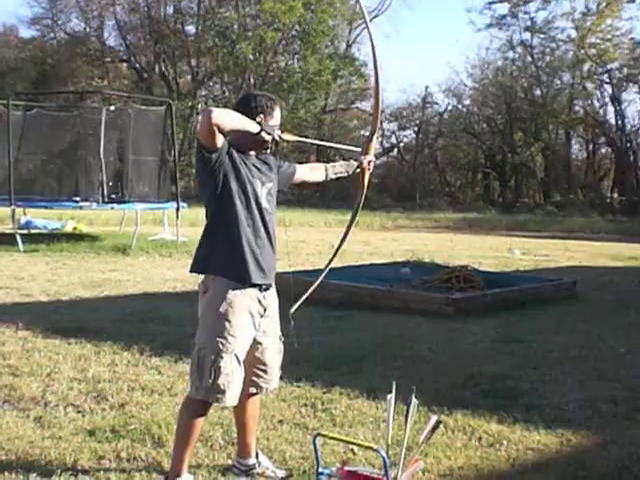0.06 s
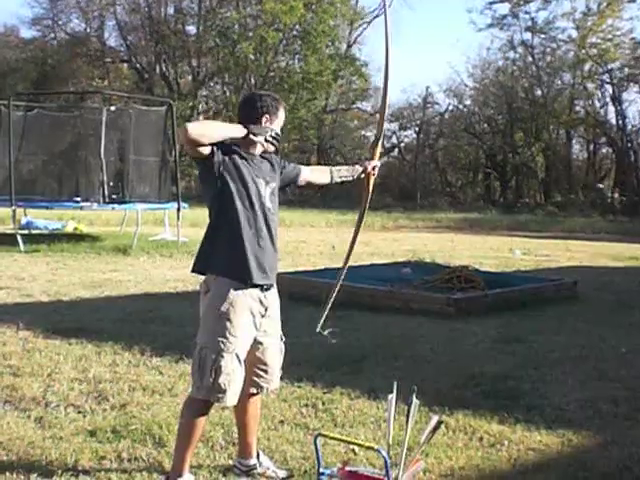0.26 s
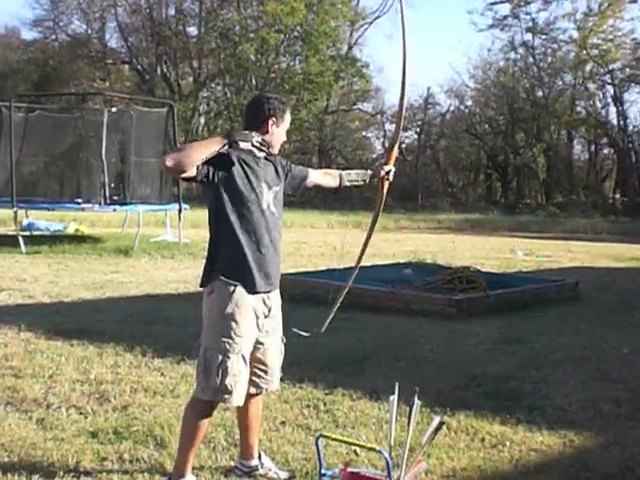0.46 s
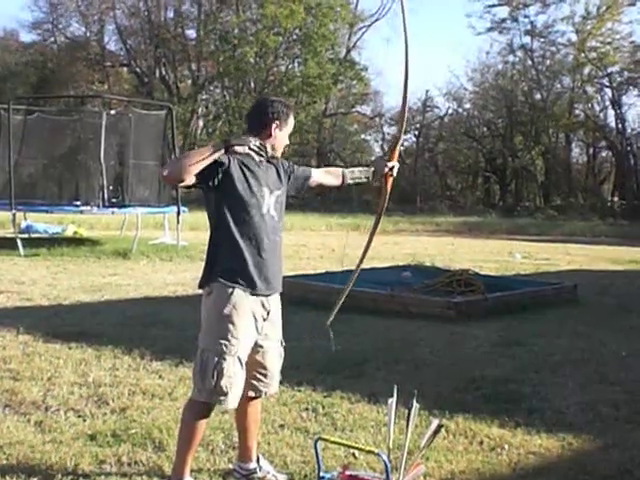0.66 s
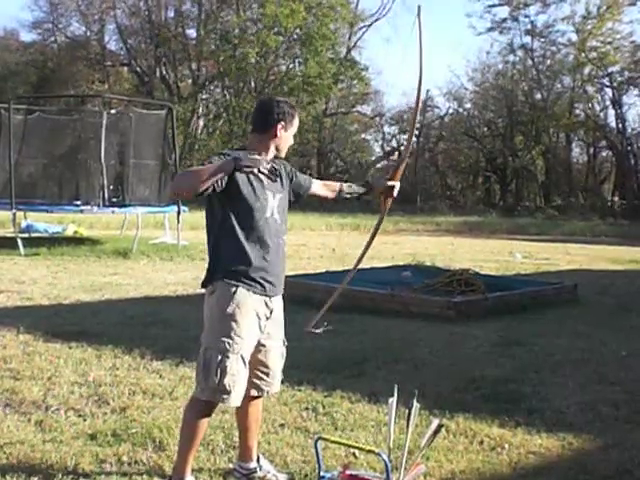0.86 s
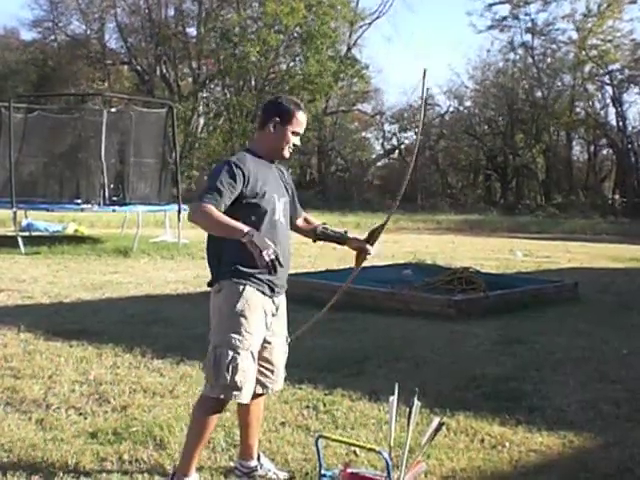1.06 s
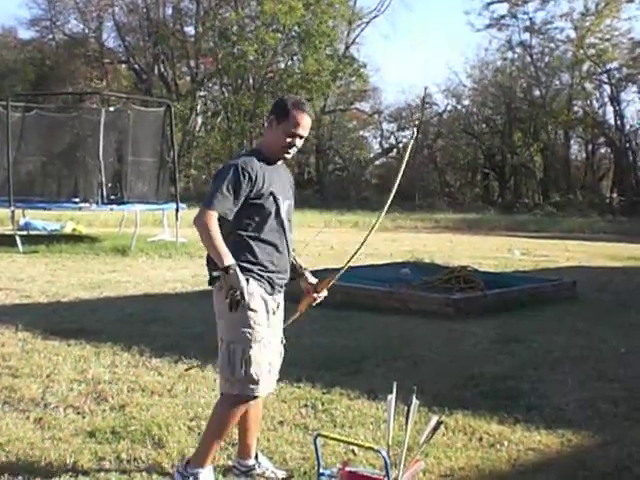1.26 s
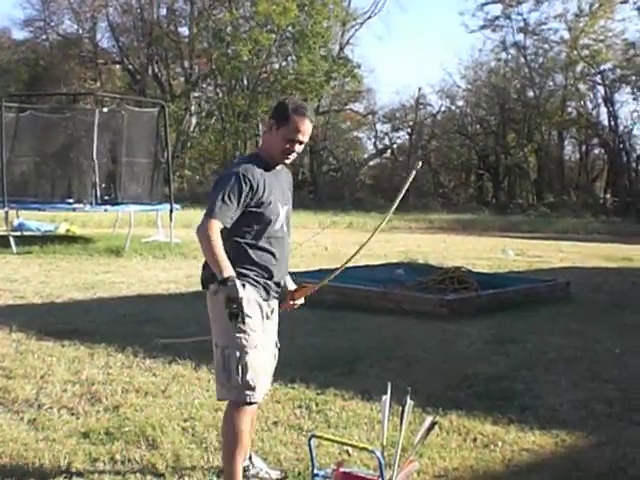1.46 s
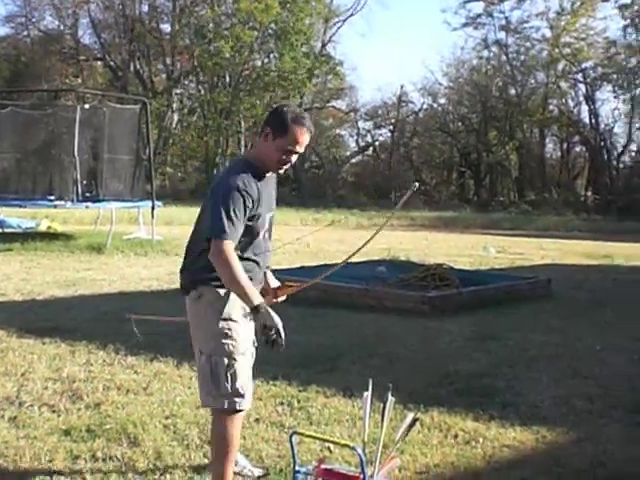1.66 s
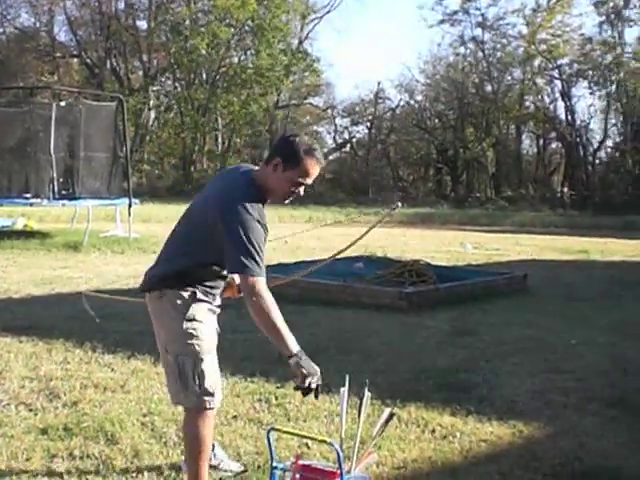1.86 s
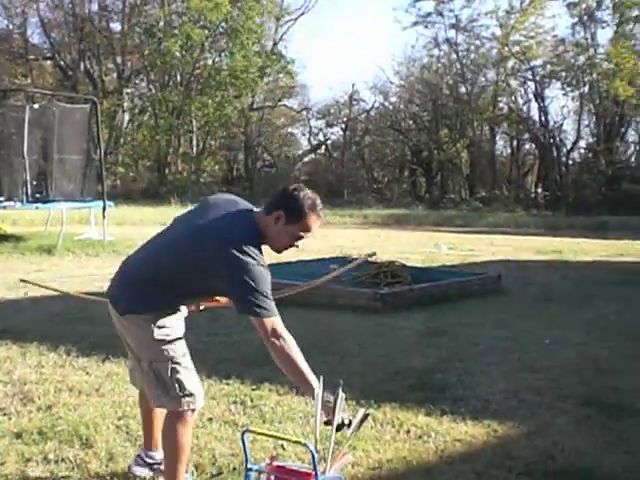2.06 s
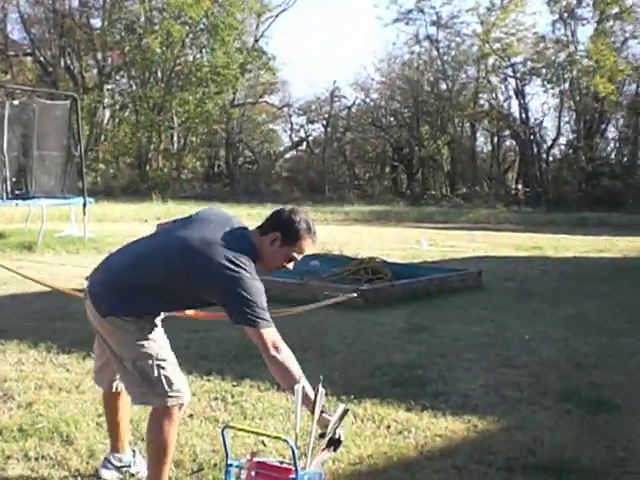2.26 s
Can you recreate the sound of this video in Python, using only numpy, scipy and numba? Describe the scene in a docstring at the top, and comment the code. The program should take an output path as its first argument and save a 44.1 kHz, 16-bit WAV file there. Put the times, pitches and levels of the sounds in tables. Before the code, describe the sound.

Arrow shot from a bow outdoors, in mono: dry string release with wooden rattle, a fading whistling hiss, a cracking thump into the target, light clicks and brushing cloth, over faint distant traffic and a bird.

```python
"""Back yard with fences and trees: a longbow is shot into a target, heard in mono by a small camera with a limiter.
Near the microphone, bands of noise rub as the string slips off the glove; decaying sines ring as the arrow chatters.
Its feathers hiss and whistle away as fluttering noise; the target thuds in decaying modes, noise swells as echoes.
Then cloth brushes and gear clicks. Far off: a bird's falling note, traffic noise and a wavering hum."""
import sys
import numpy as np
from scipy import signal
from scipy.fft import rfft, irfft
from scipy.io import wavfile
from scipy.ndimage import uniform_filter1d
from numba import njit

SR = 44100
rng = np.random.default_rng(int(sys.argv[2]) if len(sys.argv) > 2 else 0)


def to_wav(s):
    """Save 16-bit WAV."""
    ch = np.atleast_2d(s).T  # columns
    pcm = np.round(np.clip(ch, -1, 1) * 32767)  # PCM
    wavfile.write(sys.argv[1], SR, pcm.astype(np.int16))


N = 101429
T = np.arange(N) / SR


def undb(db):
    """Decibels to gain."""
    return 10 ** (np.asarray(db) / 20)


def unit(x):
    """Scale to rms 1."""
    return x / np.sqrt(np.mean(x ** 2))


def curve(rows):
    """Gain over time from (s, dB) points."""
    return undb(np.interp(T, *np.array(rows).T))


def shaped_noise(gain):
    """White noise given a gain at each frequency, at rms 1."""
    return unit(irfft(rfft(rng.standard_normal(N)) * gain, N))


def frequencies():
    """Frequencies of the spectrum in Hz, kept off zero."""
    return np.maximum(np.fft.rfftfreq(N, 1 / SR), 1)


def noise(points):
    """Noise coloured by (Hz, dB) points, joined along log frequency."""
    hz, db = np.array(points).T
    return shaped_noise(undb(np.interp(np.log(frequencies()), np.log(hz), db)))


def band(hz, width):
    """Noise in one resonance, centre and width in Hz."""
    f = frequencies()
    return shaped_noise(1 / (1 + 1j * (f / hz - hz / f) * hz / width))


def walk(rate):
    """Smooth random wander of rms 1; a higher rate in Hz wanders faster."""
    k = max(int(SR / rate), 1)
    once = uniform_filter1d(rng.standard_normal(N), k)
    return unit(uniform_filter1d(once, k))


def fade(t, t60):
    """Exponential decay from time zero, 60 dB down after t60 seconds."""
    return np.exp(-np.log(1000) * np.maximum(t, 0) / t60)


def swell(start, rise, t60):
    """Envelope: a curved rise, then a decay, all in seconds."""
    return np.clip((T - start) / rise, 0, 1) ** 2 * fade(T - start - rise, t60)


def strike(blows, modes):
    """Blows (s, dB) ring a set of decaying sine modes (Hz, dB, t60 s) of alternating sign."""
    t = T[:SR // 4]
    ring = np.zeros(len(t))
    for k, (hz, db, t60) in enumerate(modes):
        ring += (-1) ** k * undb(db) * np.sin(2 * np.pi * hz * t) * fade(t, t60)
    push = np.zeros(N)
    for s, db in blows:
        push[int(s * SR)] += undb(db)
    return signal.fftconvolve(push, ring)[:N]


# Hiss of the microphone itself. Each row: frequency in Hz, relative level in dB per Hz.
MICROPHONE_COLOUR = [(1000, -4.5), (3000, 1.5), (6500, -2.5), (7700, -5), (8900, 0), (10000, -6),
                     (13000, -2), (15500, 1)]
MICROPHONE_DB = -57.5


def microphone_hiss():
    """The microphone's own steady noise, with a fixed colour."""
    return undb(MICROPHONE_DB) * noise(MICROPHONE_COLOUR)


# Distant traffic, its swell. Each row: time in seconds, level in dB.
TRAFFIC_SWELL = [(0, -53.5), (.9, -55), (1.3, -55), (1.9, -53.5), (2.15, -51.5), (2.3, -53.5)]
# Colour of the distant traffic. Each row: frequency in Hz, relative level in dB per Hz.
TRAFFIC_COLOUR = [(25, -6.5), (70, -4), (150, -5.5), (300, -2), (450, -4), (750, -0.5), (1100, -4),
                  (1700, -12), (3000, -19), (6000, -29.5)]


def distant_traffic():
    """Many far engines and tyres blur into coloured noise whose level wanders."""
    unsteady = undb(0.86 * walk(6))  # spread in dB, rate in Hz
    return curve(TRAFFIC_SWELL) * noise(TRAFFIC_COLOUR) * unsteady


HUM_HZ, HUM_DB = 439.6, -62.5


def machine_hum():
    """A faint machine tone wavers slightly in pitch and more slowly in level."""
    hz = HUM_HZ * (1 + 0.0034 * walk(7.3))
    level = undb(HUM_DB + 3.9 * walk(2.8))
    return np.sin(2 * np.pi * np.cumsum(hz) / SR) * level


BIRD_S, BIRD_LENGTH_S, BIRD_HZ, BIRD_END_HZ = 1.715, .08, 2990, 1970
BIRD_DB, BIRD_T60_S = -53.5, 0.22


def far_bird():
    """A single falling whistle, smeared by the trees through a decaying noise response."""
    along = np.clip((T - BIRD_S) / BIRD_LENGTH_S, 0, 1)
    hz = BIRD_HZ * (BIRD_END_HZ / BIRD_HZ) ** along
    note = np.sqrt(4 * along * (1 - along)) * np.sin(2 * np.pi * np.cumsum(hz) / SR)
    trees = rng.standard_normal(N) * fade(T, BIRD_T60_S)
    smeared = signal.fftconvolve(note, trees / np.linalg.norm(trees))[:N]
    return undb(BIRD_DB) * (note + smeared)


# Cloth brushing after the shot. Each row: time in seconds, level in dB.
CLOTH_SWELL = [(1.1, -68), (1.3, -56.5), (1.5, -49), (1.61, -47.5), (1.645, -53.5), (1.72, -58.5),
               (1.9, -55.5), (2.1, -58), (2.3, -63)]
# Colour of the cloth. Each row: frequency in Hz, relative level in dB per Hz.
CLOTH_COLOUR = [(500, -17), (2000, -6), (4200, -0.5), (6000, -5.5), (9000, 0.5), (12000, 2.5), (15000, 1.5)]


def cloth_brush():
    """Cloth brushes as the arm drops: noise with a quick, uneven level."""
    return curve(CLOTH_SWELL) * noise(CLOTH_COLOUR) * undb(1.76 * walk(120))


# Clicks of string, glove and gear. Each row: start in seconds, level in dB, t60 in seconds, centre in Hz.
CLICK_ROWS = [(0.339, -33, .01, 11000), (0.3385, -30, 0.016, 1690), (1.618, -19.5, 0.0031, 11000),
              (1.621, -24, 0.0053, 9000), (1.621, -34.5, 0.013, 1700), (1.6266, -26.5, 0.0075, 10000),
              (1.6535, -22.5, 0.0042, 13000), (1.692, -33, .012, 11900), (1.7219, -31, 0.0047, 6950),
              (1.806, -38, 0.0048, 13000), (1.866, -40, .005, 14000), (1.917, -42, .005, 14000),
              (2.004, -39.5, .008, 13000), (2.256, -42, .004, 9000)]
CLICK_WIDTH = 0.77  # share of the centre


def gear_clicks():
    """Small hard parts click: sharp, short bursts of resonant noise."""
    out = np.zeros(N)
    for s, db, t60, hz in CLICK_ROWS:
        out += undb(db) * swell(s, 0.00019, t60) * band(hz, CLICK_WIDTH * hz)
    return out


# Hiss of the feathers on the way out. Each row: frequency in Hz, relative level in dB per Hz.
FEATHER_COLOUR = [(150, -13), (500, -13), (950, -3), (1500, -9), (3000, -8), (4500, -3.5), (6500, 1.5),
                  (8500, -8.5), (10500, -22), (16000, -30)]
# Whistles of the feathers. Each row: centre in Hz, width in Hz, relative level in dB.
FEATHER_WHISTLES = [(4170, 130, -3.5), (4940, 89, 3), (5530, 76, -2), (6100, 150, -3), (6840, 90, 0),
                    (7560, 110, -14), (8200, 110, -20.5)]
FLIGHT_S, FLIGHT_RISE_S, FLIGHT_T60_S = 0.26, 0.042, 0.27
FLIGHT_DB, FLIGHT_FIRST_DB = -28.5, -9.5  # level of the hiss, and its onset relative to that
WHISTLE_DB, WHISTLE_T60_S, FLUTTER_DB = -36, 0.17, 2.5
FAR_FLIGHT_DB = -64  # steady whistle under the fading one
HIT_S = 0.6146  # ends the flight


def flight():
    """The feathers hiss and whistle, fluttering as the arrow flexes and fading as it leaves."""
    whistle = unit(sum(undb(db) * band(hz, width) for hz, width, db in FEATHER_WHISTLES))
    rise = undb(FLIGHT_FIRST_DB * np.clip(1 - (T - FLIGHT_S) / FLIGHT_RISE_S, 0, 1))
    leaving = fade(T - FLIGHT_S - FLIGHT_RISE_S, FLIGHT_T60_S)
    hiss = undb(FLIGHT_DB) * rise * leaving * noise(FEATHER_COLOUR)
    whistle_level = undb(WHISTLE_DB) * swell(FLIGHT_S, FLIGHT_RISE_S, WHISTLE_T60_S) + undb(FAR_FLIGHT_DB)
    flutter = undb(FLUTTER_DB * walk(300))
    in_air = (T > FLIGHT_S) * (T < HIT_S)
    return (hiss + whistle_level * whistle) * flutter * in_air


# Rubs close by: string off the glove, shaft on the bow, feathers on the bow.
# Each row: start in seconds, rise in seconds, t60 in seconds, level in dB, centre in Hz, width in Hz.
RUB_ROWS = [(0.2309, 0.0064, 0.023, -22.5, 3620, 1300), (0.2466, 0.0016, .05, -25, 3260, 3500),
            (0.2486, 0.0063, 0.042, -17, 3800, 3200), (0.253, 0.00076, .012, -17, 12400, 7000)]


def release_rubs():
    """String, shaft and feathers slide over glove and bow: friction as swelling bands of noise."""
    out = np.zeros(N)
    for s, rise, t60, db, hz, width in RUB_ROWS:
        out += undb(db) * swell(s, rise, t60) * band(hz, width)
    return out


# Ring of shaft and bow. Each row: frequency in Hz, relative level in dB, t60 in seconds.
SHAFT_MODES = [(325, -38, 0.11), (899, -34, 0.12), (1182, -40.5, 0.064), (1845, -31, 0.058),
               (2155, -26.5, 0.053), (2950, -36.5, 0.018), (4110, -9, 0.008), (4860, 1, 0.0029),
               (5340, -1, 0.0037), (6850, -8.5, 0.0024)]
# Lighter knocks of string and bow. Each row: time in seconds, level in dB.
LIGHT_KNOCKS = [(0.2374, -11.5), (.2860, -18), (.3066, -11.5)]
CHATTER_S, CHATTER_HZ, CHATTER_DB, CHATTER_T60_S = .2549, 641, 2.5, .03
CHATTER_JITTER = 0.061  # spread of the timing, share of a period


def arrow_chatter():
    """The arrow bounces along the bow in a dying buzz; bounces and knocks ring shaft and bow."""
    chance = rng.standard_normal((12, 2))  # one row a bounce: timing, level
    after = np.arange(len(chance)) / CHATTER_HZ
    times = CHATTER_S + after + CHATTER_JITTER * chance[:, 0] / CHATTER_HZ
    dying_db = 20 * np.log10(fade(after - 1 / CHATTER_HZ, CHATTER_T60_S))
    levels = CHATTER_DB + dying_db + chance[:, 1]
    return strike(list(zip(times, levels)) + list(LIGHT_KNOCKS), SHAFT_MODES)


# Scattered echoes off the yard and the tree line.
# Each row: delay in seconds, rise in seconds, t60 in seconds, level of the thud in dB, level of the knock in dB.
ECHO_ROWS = [(.004, 0.014, 0.3, -34.5, -37), (.15, 0.03, 1, -61, -54.5)]
# Colour of the echoed thud. Each row: frequency in Hz, relative level in dB per Hz.
THUD_COLOUR = [(100, -27), (230, -3), (350, 1), (650, -8), (1000, -15), (2000, -47)]
# Colour of the echoed knock. Each row: frequency in Hz, relative level in dB per Hz.
KNOCK_COLOUR = [(1200, -35), (1900, -2.5), (2500, 2.5), (3300, -8), (4500, -18.5), (9000, -40)]


def yard_echoes():
    """The yard and the tree line scatter the hit back as swells of low and high noise."""
    thud, knock = noise(THUD_COLOUR), noise(KNOCK_COLOUR)
    out = np.zeros(N)
    for delay, rise, t60, low_db, high_db in ECHO_ROWS:
        scattered = undb(low_db) * thud + undb(high_db) * knock
        out += swell(HIT_S + delay, rise, t60) * scattered
    return out


# Target face and the arrow in it. Each row: frequency in Hz, relative level in dB, t60 in seconds.
TARGET_MODES = [(230.6, -19.5, .026), (338, -12.5, 0.021), (473, -13.5, 0.016), (646, -13, 0.022),
                (730, -20, 0.022), (1490, -26, 0.0036), (1980, -12.5, 0.0054), (2550, 1, 0.0051),
                (3280, -1, 0.0026), (4550, -8.5, 0.0033), (7600, -14.5, 0.0013)]
HIT_DB, CRACK_DB, CRACK_T60_S = 7, -15, 0.0052


def target_hit():
    """The point cracks in as a short noise burst; the target thumps in damped modes."""
    thump = strike([(HIT_S, HIT_DB)], TARGET_MODES)
    crack = undb(CRACK_DB) * swell(HIT_S, 0.00025, CRACK_T60_S) * band(9300, 14000)
    return thump + crack


def scene():
    """The shot and its surroundings, in mono."""
    background = microphone_hiss() + distant_traffic() + machine_hum() + far_bird()
    archer = cloth_brush() + gear_clicks()
    shot = flight() + release_rubs() + arrow_chatter() + yard_echoes() + target_hit()
    return (background + archer + shot)[None]


@njit
def follow(x, attack, recover):
    """Peak follower: moves by one share of the gap when rising, another when falling."""
    out, e = np.empty(len(x)), 0.
    for i in range(len(x)):
        e += (x[i] - e) * (attack if x[i] > e else recover)
        out[i] = e
    return out


LIMIT_DB, LIMIT_ATTACK_S, LIMIT_RELEASE_S = -8, 0.00051, 0.17
CLIP_DB, TOP_HZ = -0.5, 15900


def record(dry):
    """A limiter ducks after the loudest peaks, what slips through is rounded, and the top is cut."""
    peak = follow(np.abs(dry[0]), 1 / (LIMIT_ATTACK_S * SR), 1 / (LIMIT_RELEASE_S * SR))
    limited = dry / np.maximum(peak / undb(LIMIT_DB), 1)
    rounded = undb(CLIP_DB) * np.tanh(limited / undb(CLIP_DB))
    top_cut = signal.ellip(10, .2, 70, TOP_HZ, fs=SR, output="sos")
    return signal.sosfilt(top_cut, rounded)


dry = scene()
out = record(dry)
to_wav(out)
```